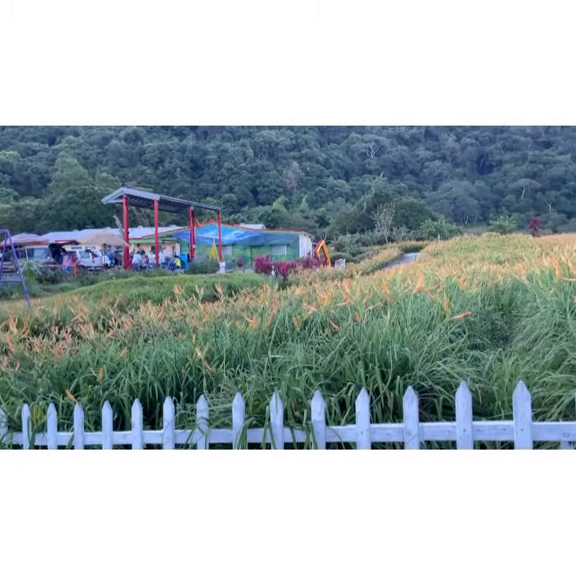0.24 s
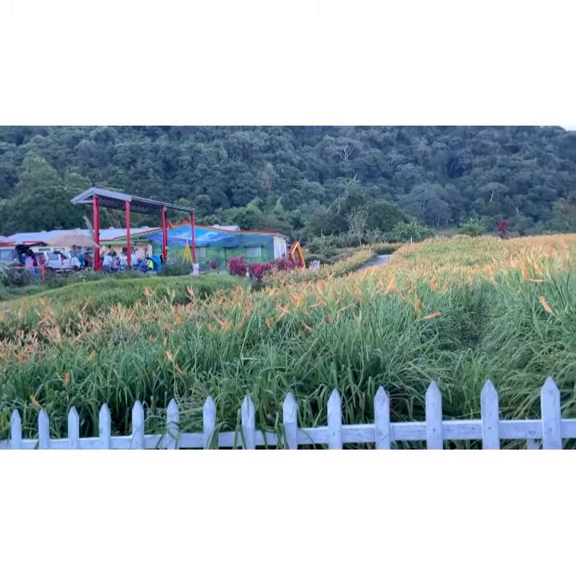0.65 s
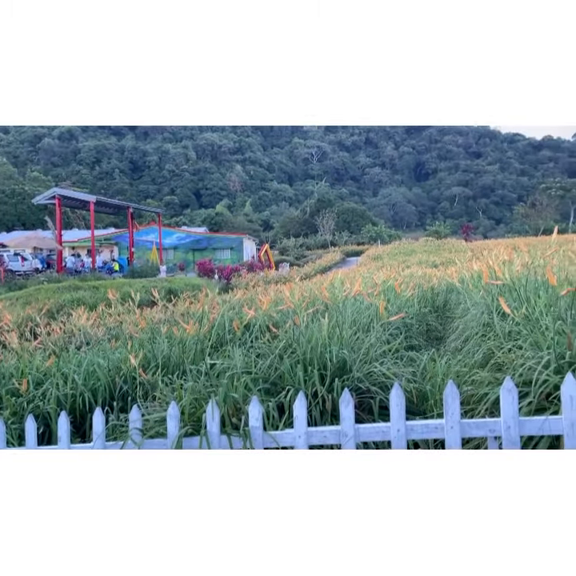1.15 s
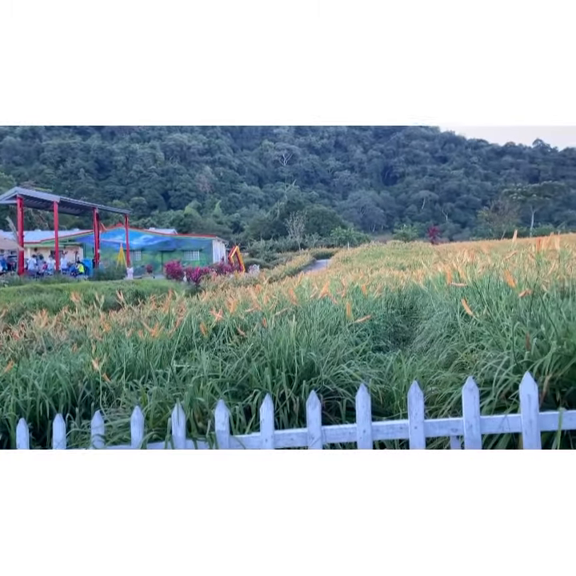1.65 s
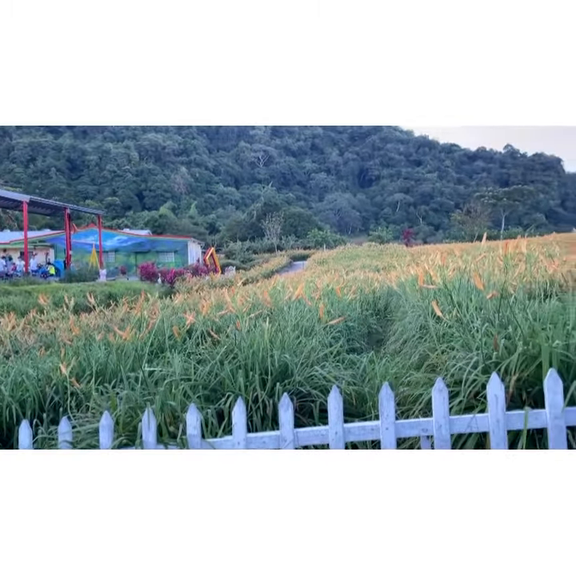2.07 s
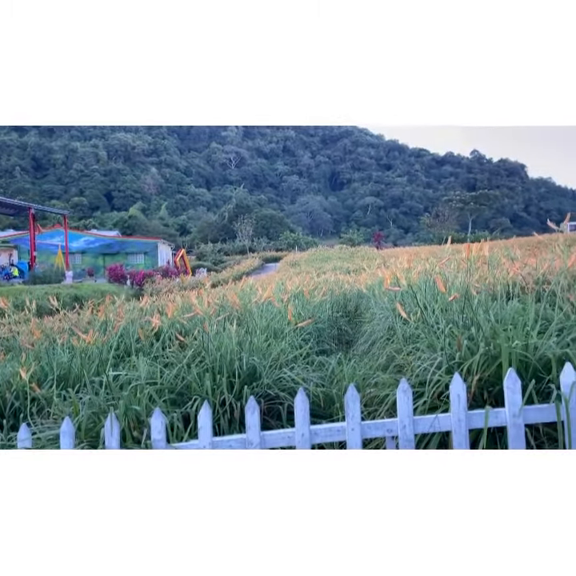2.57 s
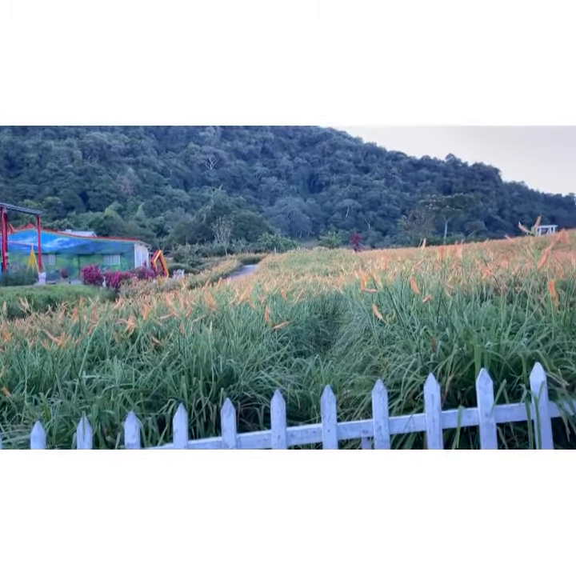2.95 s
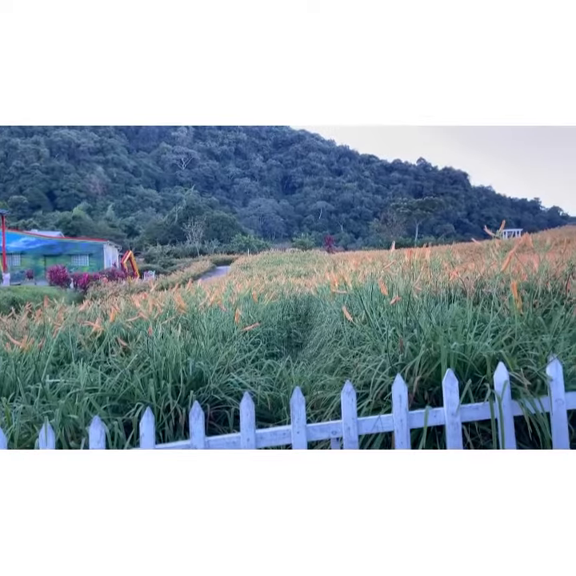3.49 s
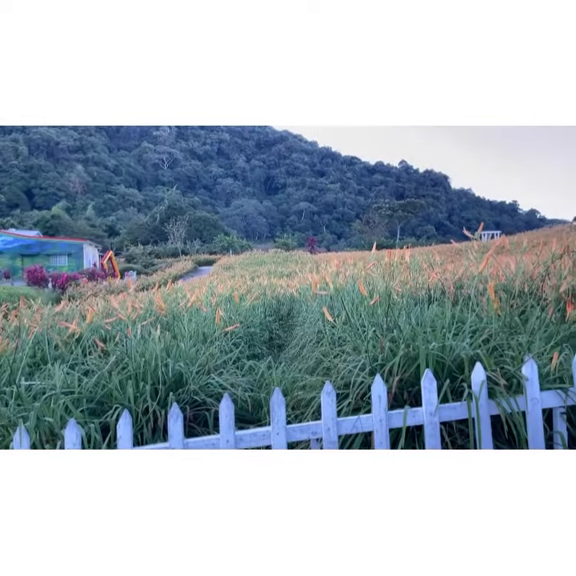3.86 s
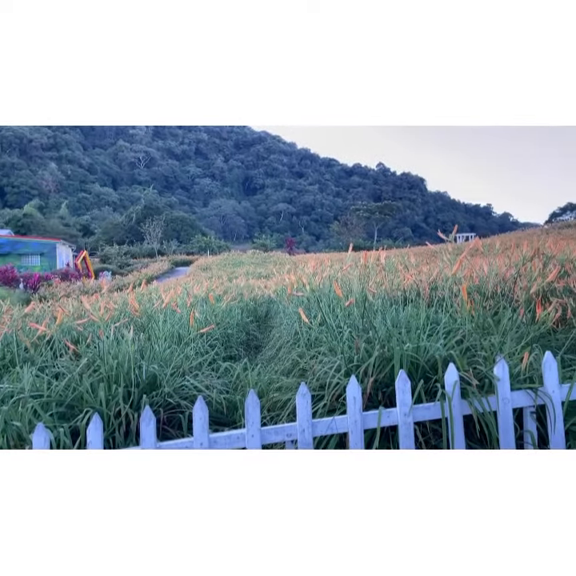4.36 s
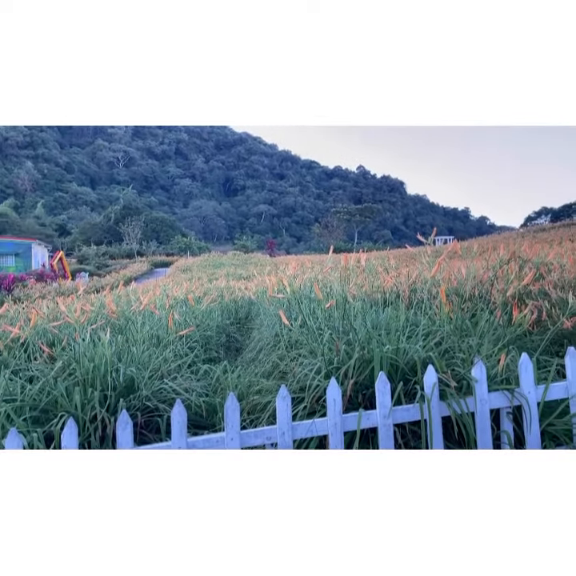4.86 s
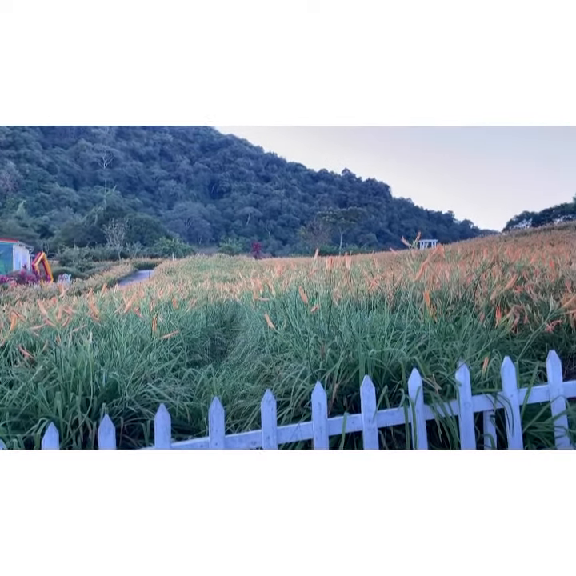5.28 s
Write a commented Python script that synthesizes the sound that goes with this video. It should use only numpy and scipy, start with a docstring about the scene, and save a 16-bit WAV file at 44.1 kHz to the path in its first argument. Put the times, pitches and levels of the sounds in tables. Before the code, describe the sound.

On an open hillside field, a small bird gives quick, bright four-note chirps about four times a second, pausing in the middle. A larger bird squawks roughly near one, under three and four seconds. An insect trills in bouts about once a second. A dry snap cracks close by around three and a half seconds. Far crickets, low machine rumble and airy wash lie beneath; the microphone is outdoors, mono, with light hillside echoes.

```python
"""A distant machine rumbles under the end of an insect's trill, and at once a small bird starts its four-note call.
It repeats through the evening over a hillside field; a larger bird squawks three times in rough harmonic strokes.
The insect trills in bouts of falling chirps over a far cricket chorus of narrow noise; shaped noise is the air.
Something dry snaps loudly once close by, as cracks with a sharp front; a low thump and damped ticking rings
are heard too. Scattered, decaying echoes from the hill follow the near sounds."""
import sys
import numpy as np
from scipy import signal
from scipy.fft import rfft, irfft
from scipy.io import wavfile
from scipy.ndimage import uniform_filter1d

SR = 44100
rng = np.random.default_rng(int(sys.argv[2]) if len(sys.argv) > 2 else 0)


def voltage_ratio(level):
    """Linear amplitude factor for a level in decibels (scalar or array-like)."""
    return 10 ** (np.asarray(level, float) / 20)


def put_to_file(sound):
    """Save the sound as 16-bit audio at rate SR, in the file named by the first command-line argument."""
    columns = np.atleast_2d(sound).T  # one column per channel
    safe = np.clip(columns, -1, 1)
    whole_steps = np.round(safe * 32767)
    wavfile.write(sys.argv[1], SR, whole_steps.astype(np.int16))


N = 243873  # samples in the scene


def evened(x):
    """Scales to rms 1."""
    return x / np.sqrt(np.mean(x ** 2) + 1e-20)


def read(points, hz):
    """Reads a curve over frequency on a log-frequency axis."""
    f, value = np.transpose(points)
    return np.interp(np.log(hz + 1), np.log(f + 1), value)


def level_curve(rows):
    """A level in dB at every sample of the scene."""
    s, db = np.transpose(rows)
    return np.interp(np.arange(N) / SR, s, db)


def course(rows):
    """Start time and the columns of a curve, sample by sample."""
    s, *columns = np.transpose(rows)
    t = np.arange(s[0], s[-1], 1 / SR)
    return s[0], *(np.interp(t, s, c) for c in columns)


def add(mix, s, sound):
    """Mixes a sound in at time s, trimmed to the scene."""
    at = round(s * SR)
    part = mix[max(at, 0):][:max(len(sound) + min(at, 0), 0)]
    part += sound[max(-at, 0):][:len(part)]


def slow_noise(span, count):
    """Random wavering: noise averaged over a span of samples."""
    return uniform_filter1d(rng.standard_normal(8000), span)[:count]


def whistle(rows, overtone_db):
    """A gliding fundamental and its octave on a level curve, with soft ends."""
    s, hz, db = course(rows)
    phase = 2 * np.pi * (np.cumsum(hz) / SR + rng.random())
    tone = np.sin(phase) + voltage_ratio(overtone_db) * np.sin(2 * phase)
    return s, np.sqrt(2) * voltage_ratio(db) * tone * signal.windows.tukey(len(hz), .15)


def resonate(x, hz, width):
    """A steep resonance: shift down, smooth twice, shift back."""
    turn = np.exp(2j * np.pi * np.cumsum(hz * np.ones(len(x))) / SR)
    r = np.exp(-np.pi * width / SR)
    smooth = signal.lfilter([(1 - r) ** 2], [1, -2 * r, r * r], x / turn)
    return 2 * (turn * smooth).real


def fuzzy_tones(tones, level, bend=1):
    """Noise in narrow resonances on one level curve."""
    tone = sum(voltage_ratio(db) * evened(resonate(rng.standard_normal(N), hz * bend, width))
               for hz, width, db in tones)
    return evened(tone) * voltage_ratio(level_curve(level))


def note_course(rest_hz, bend_hz, bend_s, rise, fall):
    """A note's pitch bends exponentially from its rest; its level falls away on both sides of the peak."""
    t = np.arange(-1.2 * rise, 1.15 * fall, 10 / SR)
    shape = np.where(t < 0, abs(t / rise) ** 1.5, abs(t / fall) ** 1.9)
    hz = np.clip(rest_hz + bend_hz * np.exp(t / bend_s), 3000, 8000)
    return np.transpose([t, hz, -20 * shape])


# calls: (t/s of the rising note's peak, level/dB, first and last note's level/dB against it,
#         t/s from there to the last note's peak)
CALLS = [(0.1354, -36.5, -7, -1, 0.0405), (0.4044, -38, -3, 0, 0.0381), (0.6545, -35.5, -8, -3.5, 0.0415),
         (0.9252, -36.5, -5, -1.5, 0.0381), (1.1589, -38, -12, -.5, 0.0421), (1.4118, -35, -4.5, 0, 0.0391),
         (1.6474, -35, -3.5, -1, 0.0411), (1.9557, -36.5, -2, 0, 0.0411), (2.9093, -41, -3, 2, 0.0381),
         (3.1747, -40, -3.5, -1, 0.0381), (3.4162, -39, -3.5, 0, 0.0379), (3.6547, -36.5, -5.5, -2, 0.0401),
         (3.9052, -35.5, -5.5, -1.5, 0.0391), (4.1592, -36, -7, -5.5, 0.0386),
         (4.4044, -35.5, -4, -4.5, 0.0387), (4.6483, -35.5, -5, -4, 0.0397)]
# the four notes: (rest f/Hz, bend f/Hz, bend time t/s, t/s from 20 dB down up to the peak, t/s to 20 dB down)
FIRST_NOTE = (4480, -40, .003, .011, .0042)
RISING_NOTE = (5040, 350, .0039, .0115, .0076)
LOW_NOTE = (3950, -100, -.01, .009, .0062)
LAST_NOTE = (4590, 270, -.003, .0048, .0105)


def small_bird():
    """Four gliding whistled notes a call, each scattered a little in pitch and level."""
    out = np.zeros(N)
    first_lead_s, low_lead_s, low_db = .0241, .013, -9  # leads on the rising and the last note
    for s, db, first_db, last_db, gap in CALLS:
        notes = ((FIRST_NOTE, -first_lead_s, first_db, -66), (RISING_NOTE, 0, 0, -66),
                 (LOW_NOTE, gap - low_lead_s, low_db, -66), (LAST_NOTE, gap, last_db, -46))
        for note, at, rel_db, overtone_db in notes:
            pitch_drift, level_drift_db = rng.standard_normal(2)
            rows = note_course(*note) * [1, 1 + 0.011 * pitch_drift, 1]
            lead, sound = whistle(rows, overtone_db)
            add(out, s + at + lead, voltage_ratio(db + rel_db + level_drift_db) * sound)
    return out


def stroke_course(factor, pace):
    """Start, pitch and level of one stroke: pitch climbs and levels off while level swells, holds and dies."""
    open_hz, top_hz, climb_s = 1034, 1610, .028  # at pitch factor 1 and pace 1
    lead_s, swell_s, hold_s, die_s = .008, .028, .056, .026  # at pace 1
    t = np.arange(-lead_s, swell_s + hold_s + die_s, pace / SR)
    hz = factor * (top_hz - (top_hz - open_hz) * np.exp(-t / climb_s))
    db = np.interp(t, [-lead_s, 0, swell_s, swell_s + hold_s, t[-1]], [-35, -12, 0, 0, -37])
    return -lead_s / pace, hz, db


# throat resonance: (f/Hz, relative level/dB)
THROAT = [(1000, -36), (1600, -13), (2400, -5.5), (3100, 2), (4500, -3.5), (6000, -7.5), (8000, -13),
          (10800, -14.5), (12500, -34)]


def squawk_stroke(effort_db, factor, pace, rough, tilt_db):
    """Eight wavering harmonics and a rush of hiss, both coloured by the throat."""
    lead, hz, db = stroke_course(factor, pace)
    count = len(hz)
    hz = hz * (1 + .25 * slow_noise(250, count))
    turns, stack = np.cumsum(hz) / SR, 0
    for k in range(1, 9):
        flutter = 1 + 2.2 * (k - .6) * slow_noise(90, count)  # breaks up the upper lines most
        gain = voltage_ratio(read(THROAT, k * hz) + (tilt_db + .25 * db) * np.log2(k))  # soft moments are dull
        stack = stack + gain * np.cos(2 * np.pi * k * turns) * flutter
    f = np.fft.rfftfreq(8000, 1 / SR)
    hiss_db = read(THROAT, f) + (tilt_db + 10) * np.log2(1 + f / 1500)  # turbulence is brighter than the voice
    hiss = irfft(rfft(rng.standard_normal(8000)) * voltage_ratio(hiss_db))[:count]
    hiss = hiss * voltage_ratio(0.45 * db - 70 * np.arange(count) / SR)  # the rush of air slackens through the stroke
    voice = (1 - rough) * evened(stack) + rough * evened(hiss)
    return lead, voltage_ratio(effort_db + db) * evened(voice) * signal.windows.tukey(count, .1)


# glide of the second voice: (t/s, f/Hz of the fundamental at pitch factor 1, relative level/dB)
SLIDE = [(0, 1720, -6), (.016, 2050, -1), (.032, 2460, 0), (.047, 2220, -6), (.061, 2400, -7),
         (.076, 2100, -20)]


def squawk_slide(db, factor):
    """A quavering glide whose octave is stronger than its fundamental."""
    lead, sound = whistle([(s, hz * factor, rel_db) for s, hz, rel_db in SLIDE], 4.5)
    return lead, voltage_ratio(db) * sound * (1 + 3.0 * slow_noise(150, len(sound)))


# squawks: (t/s, effort level/dB, pitch factor, t/s between strokes, brightness/dB per octave)
SQUAWKS = [(1.084, -42.5, 1.0, .073, -3), (2.707, -44.5, .96, .071, -2.5), (4.074, -44.5, 1.01, .071, 2.5)]
# first, second and third stroke: (relative level/dB, pace factor, roughness 0-1, added brightness/dB per octave)
STROKE_STEPS = [(0, .95, .2, 0), (-3, 1.08, .36, -.5), (-15.5, 1.17, .45, 0)]


def large_bird():
    """Three overlapping rough strokes a squawk, with two quieter slides of a second voice."""
    out = np.zeros(N)
    for s, effort_db, factor, gap, tilt_db in SQUAWKS:
        for j, (step_db, pace, rough, more_db) in enumerate(STROKE_STEPS):
            lead, sound = squawk_stroke(effort_db + step_db, factor, pace, rough, tilt_db + more_db)
            add(out, s + j * gap + lead, sound)
        for j in range(2):
            lead, sound = squawk_slide(effort_db - 11 - 1.5 * j, factor)  # the second is softer
            add(out, s + .087 + .067 * j + lead, sound)
    throat_top = signal.cheby2(10, 50, 12268.8, fs=SR, output="sos")  # 50 dB down from this Hz up
    return signal.sosfilt(throat_top, out)


# bouts: (t/s of the last pulse, base level/dB)
TRILLS = [(0.1658, -60), (1.2124, -62.5), (2.2561, -62), (3.3069, -59.5), (4.3754, -60.5), (5.4146, -61)]
# course of a bout: (t/s before its end, f/Hz, relative level/dB)
TRILL = [(0, 6120, 3), (.22, 6120, 2.5), (.3, 6020, -3.5), (.4, 5850, -11)]


def insect():
    """Each wing stroke is a short falling chirp; a bout grows, rises and slows a little."""
    out, t = np.zeros(N), np.arange(-220, 220) / SR
    gap_s, haste_s = .01135, .000012  # pulses lie closer the further back from the end
    back, pitch_hz, level_db = np.transpose(TRILL)
    for end, db in TRILLS:
        for j, (pitch_drift, turn, level_drift) in enumerate(rng.standard_normal((38, 3))):
            before = gap_s * j - haste_s * j * j
            grown = voltage_ratio(np.interp(before, back, level_db))
            hz = np.interp(before, back, pitch_hz) * (1 + .004 * pitch_drift)
            phase = 2 * np.pi * (hz * t - 32000 * grown * t ** 2 + turn)  # stronger strokes fall faster
            tone = np.sin(phase) + voltage_ratio(-33) * np.sin(2 * phase)
            pulse = np.exp(-(t / .0021) ** 2) * tone
            add(out, end - before + t[0], np.sqrt(2) * voltage_ratio(db + 0.45 * level_drift) * grown * pulse)
    return out


# the snap, its after-crackle, and a faint crack and a rustle before: (t/s, level/dB, length t/s, tilt/dB per octave)
SNAPS = [(.417, -63.5, .022, -4), (1.024, -66, .05, -4), (3.5205, -36.5, .011, 0), (3.533, -41, .012, -1),
         (3.596, -57, .035, -4)]
# colour of the cracks: (f/Hz, relative level/dB per Hz)
SNAP_COLOUR = [(470, -52), (800, -11), (1010, -8), (1750, -10), (2100, 1), (2750, -10), (5900, -8),
               (7500, -12.5), (10500, -10.5), (14500, -33), (15800, -20)]


def snaps():
    """Bursts of uneven cracks with a sharp front."""
    out, t, hz = np.zeros(N), np.arange(4096) / SR, np.fft.rfftfreq(4096, 1 / SR)
    for s, db, length, tilt_db in SNAPS:
        unevenness_db = 2 * np.minimum(rng.exponential(1, 4096), 3)
        cracks = rng.standard_normal(4096) * voltage_ratio(unevenness_db)
        colour_db = read(SNAP_COLOUR, hz) + tilt_db * np.log2(1 + hz / 2000)
        burst = evened(irfft(rfft(cracks) * voltage_ratio(colour_db)))
        envelope = np.minimum(t / 0.00027, 1) * np.exp(-(t / length) ** 4)
        add(out, s, voltage_ratio(db) * burst * envelope)
    return out


# a low thump and short ticks: (t/s, peak level/dB, f/Hz)
THUMP_AND_TICKS = [(1.03, -40, 115), (1.036, -46, 356), (1.353, -39.5, 4600), (2.307, -43, 3500),
                   (2.64, -49, 3450), (2.682, -49, 2200), (3.69, -44.5, 645), (3.85, -44, 4455),
                   (3.889, -41, 2300), (4.347, -45, 3840), (5.394, -40.5, 3800)]


def thump_and_ticks():
    """Short damped rings, the lowest a thump, and a few faint ticks by chance."""
    out, t = np.zeros(N), np.arange(2000) / SR
    chance = rng.random((20, 3))
    times = np.cumsum(-np.log(chance[:, 0])) / 1.5  # 1.5 faint ticks a second on average
    faint = [(s, -61 - 8 * b, 3600 * 2 ** (c - .5)) for s, (_, b, c) in zip(times, chance)]
    for s, db, hz in THUMP_AND_TICKS + faint:
        u = np.pi * .33 * hz * t  # the ring's width is .33 of its pitch
        add(out, s, voltage_ratio(db) * np.e * u * np.exp(-u) * np.sin(2 * np.pi * hz * t))
    return out


# echo decay of the hillside: (f/Hz, t60 t/s)
HILL = [(1000, 0.43), (3000, 0.34), (6000, 0.28), (10000, 0.27), (14000, .15)]


def hill(x):
    """Scattered returns from plants, sheds and slope, each band dying at its own speed."""
    taps = np.zeros(SR // 2)
    at = np.arange(200, SR // 2 - 20, 20)
    taps[at + rng.integers(0, 20, len(at))] = rng.choice([-1., 1.], len(at))
    hz, t, z = signal.stft(taps, SR, nperseg=256)
    decay = voltage_ratio(-60 * t / read(HILL, hz)[:, None])
    tail = signal.istft(z * decay, SR, nperseg=256)[1]
    return signal.fftconvolve(x, tail / np.linalg.norm(tail))[:N]


# chorus bands: (f/Hz, width f/Hz, relative level/dB)
CHORUS = [(4100, 39, -5.5), (4220, 18, -5), (4489, 82, -1), (4810, 77, -5), (4400, 960, -2)]
# its steady level: (t/s, level/dB)
CHORUS_LEVEL = [(0, -60), (5.53, -60)]


def cricket_chorus():
    """The far crickets blur into a steady bed of narrow noises."""
    return fuzzy_tones(CHORUS, CHORUS_LEVEL)


# far insect bands: (f/Hz at 2.1 s, width f/Hz, relative level/dB)
FAR_INSECTS = [(7000, 230, -3), (7500, 200, 1), (8000, 260, -3), (6250, 260, 3)]
# their single bout: (t/s, level/dB)
FAR_SWELL = [(0, -110), (1.6, -92), (2.0, -78), (3.1, -77.5), (3.5, -95), (5.53, -115)]


def far_insects():
    """One bout of higher narrow noises that creep up in pitch."""
    creep = 1 + .035 * (np.arange(N) / SR - 2.1)  # share of pitch gained a second
    return fuzzy_tones(FAR_INSECTS, FAR_SWELL, creep)


# rumble bands: (f/Hz, width f/Hz, relative level/dB)
RUMBLE = [(65.3, 15.5, -6), (90.4, 11, -3), (123.2, 13.6, 1.5), (156.3, 18.6, -4.5), (206.8, 8.8, -10),
          (260, 9, -19.5)]
# its level, drifting by chance: (t/s, level/dB)
RUMBLE_LEVEL = [(0.0, -45), (0.12, -50), (0.26, -46), (0.97, -48), (1.05, -44), (1.45, -47.5), (4.4, -48),
                (5.45, -46), (5.53, -50)]
# drone bands: (f/Hz, width f/Hz, relative level/dB)
DRONE = [(462.6, 14, -0.5), (692.3, 28, -0.5), (730, 124, 4.5)]
# its fading: (t/s, level/dB)
DRONE_FADE = [(0, -61.5), (2.6, -69), (5.53, -72)]


def machine():
    """A rumble of low resonances whose level drifts by chance, and a drone that fades."""
    return fuzzy_tones(RUMBLE, RUMBLE_LEVEL) + fuzzy_tones(DRONE, DRONE_FADE)


# colour of the air: (f/Hz, relative level/dB per Hz)
AIR = [(18, -46), (30, -18), (123, -1), (307, -19.5), (467, -14), (591, -17), (1510, -24.5), (2690, -33),
       (3400, -40), (4090, -23), (4540, -35.5), (5450, -47), (7460, -52), (9680, -48.5), (15500, -80)]
# its drift about the base level: (t/s, relative level/dB)
AIR_DRIFT = [(0.0, 3), (5.53, -0.5)]


def air():
    """The far wash of the valley: shaped noise in soft patches over time and pitch."""
    base_db = -53
    frames, hz = N // 256 + 5, np.fft.rfftfreq(1024, 1 / SR)
    a, b, patches = rng.standard_normal((frames, 513, 3)).T
    patches = uniform_filter1d(patches, 12, 0)  # across frequency
    patches = evened(uniform_filter1d(patches, 14, 1))  # across time
    z = (a + 1j * b) * voltage_ratio(read(AIR, hz)[:, None] + 1.15 * patches)
    wash = evened(signal.istft(z, nperseg=1024, noverlap=768)[1][:N])
    return voltage_ratio(base_db + level_curve(AIR_DRIFT)) * wash


def scene():
    """Near callers with their echoes over the far beds."""
    small, large, trill, knocks = small_bird(), large_bird(), insect(), snaps() + thump_and_ticks()
    near = small + large + trill + knocks
    echoes = voltage_ratio(-11.5) * hill(small) + voltage_ratio(-5) * hill(large)
    echoes = echoes + voltage_ratio(-12) * hill(trill) + voltage_ratio(-8) * hill(knocks)
    beds = cricket_chorus() + far_insects() + machine() + air()
    return (near + echoes + beds)[None]


def low_pass(x):
    """Removes everything above the highest recorded frequency."""
    return signal.sosfilt(signal.butter(12, 15960, fs=SR, output="sos"), x)


def record(dry):
    """The microphone loses the deepest bass, below about 46 Hz."""
    bass_cut = signal.butter(6, 46, "high", fs=SR, output="sos")
    mix = signal.sosfilt(bass_cut, dry)
    return low_pass(mix)


dry = scene()
out = record(dry)
put_to_file(out)
```